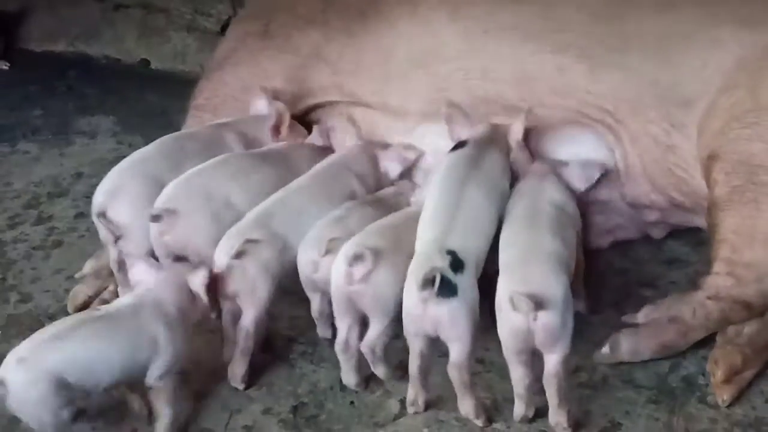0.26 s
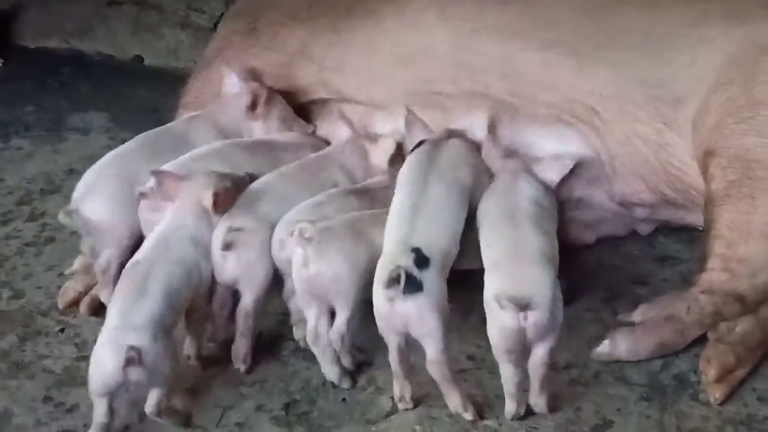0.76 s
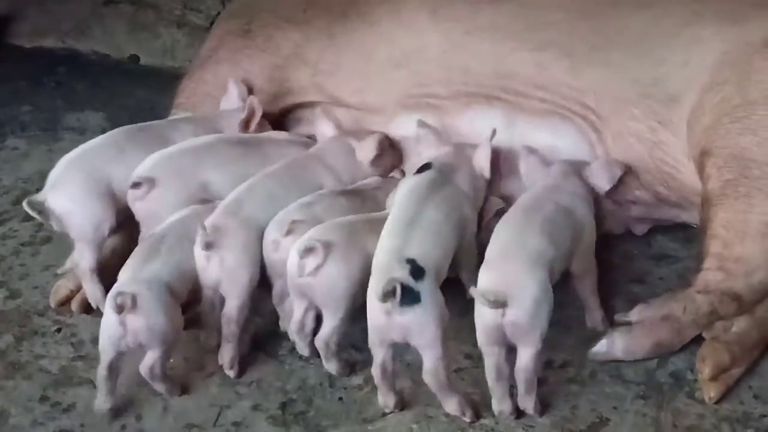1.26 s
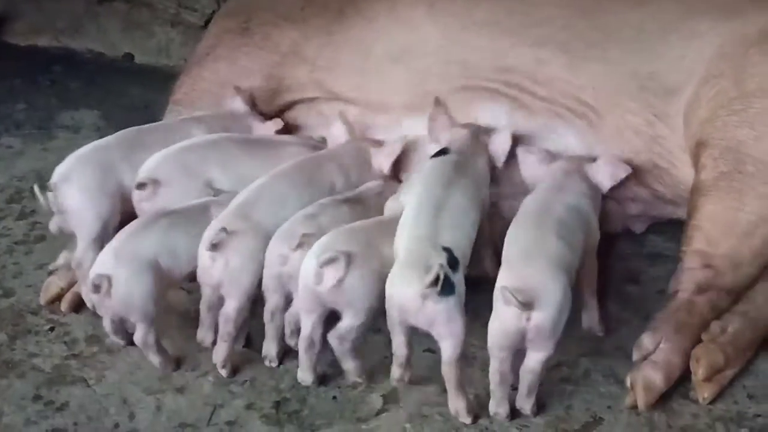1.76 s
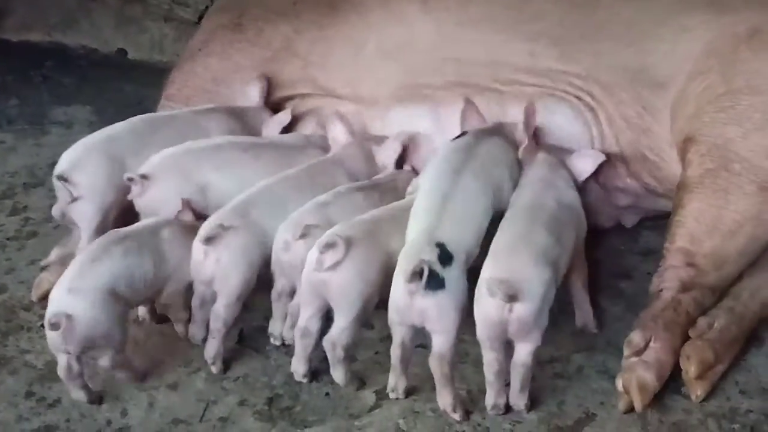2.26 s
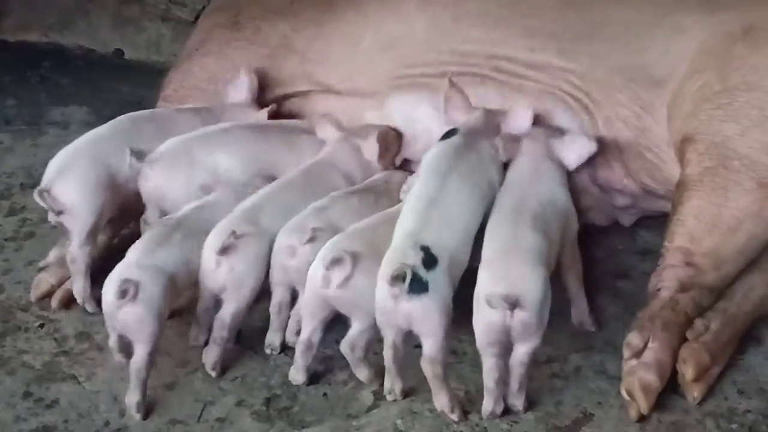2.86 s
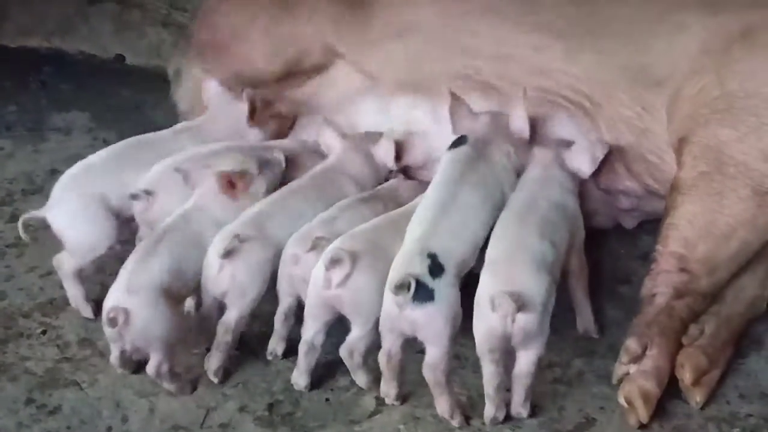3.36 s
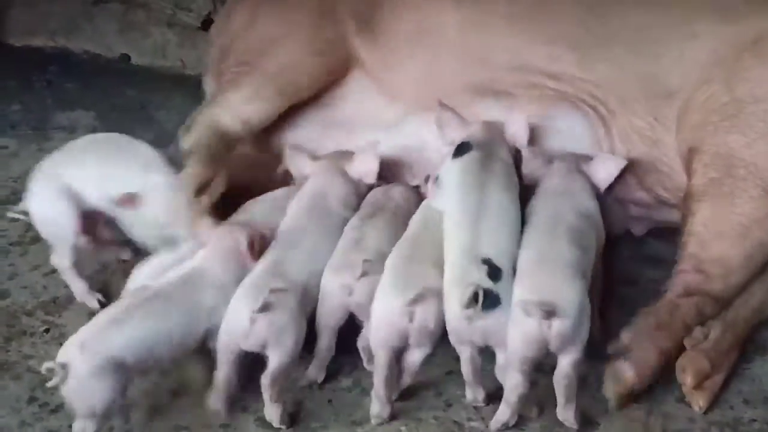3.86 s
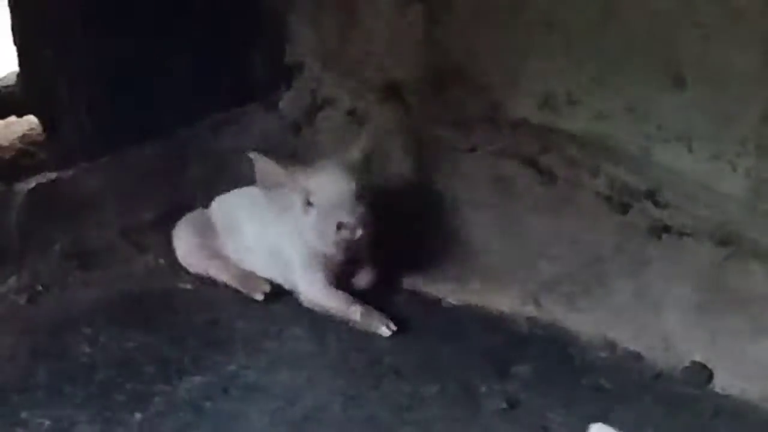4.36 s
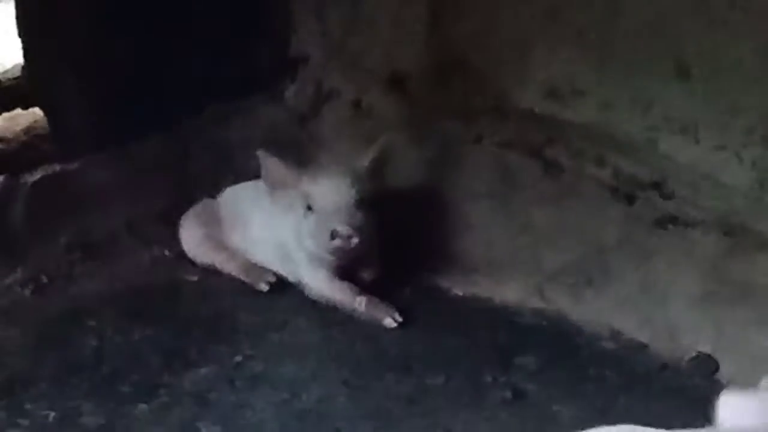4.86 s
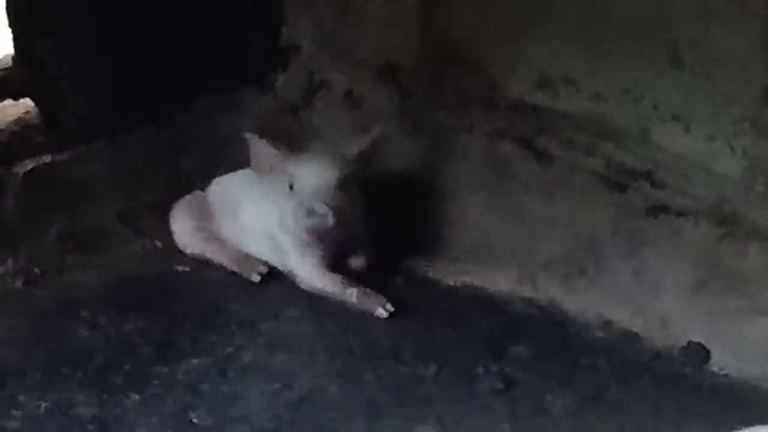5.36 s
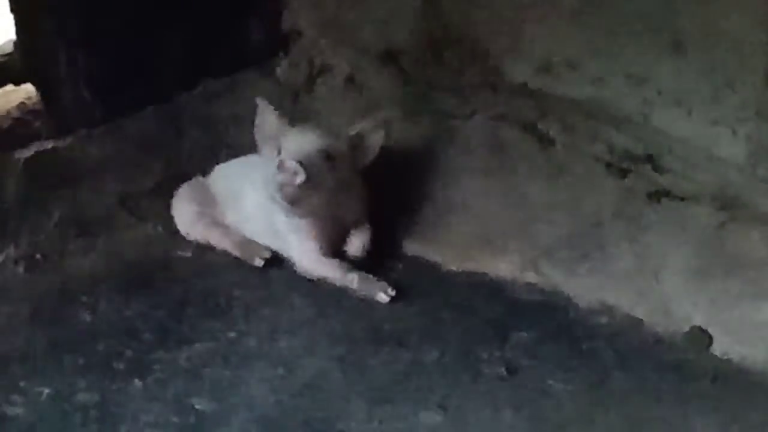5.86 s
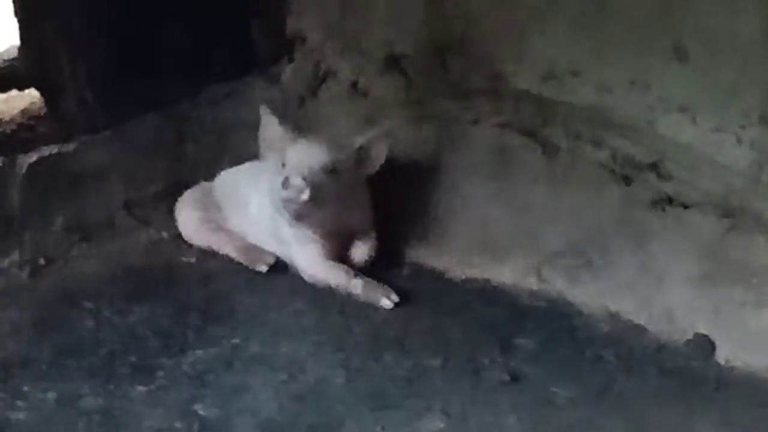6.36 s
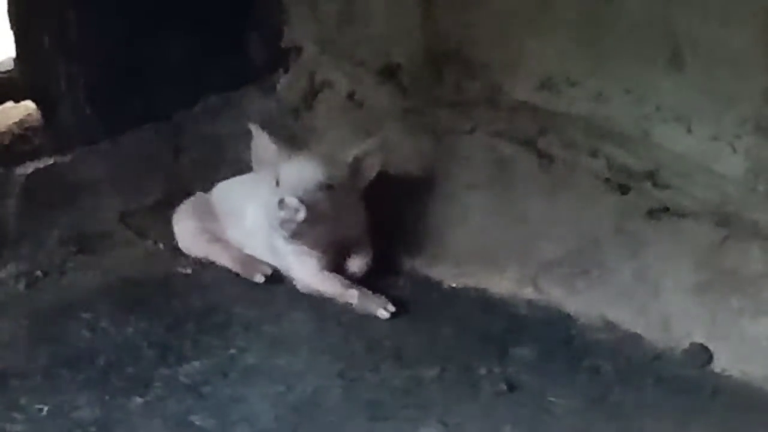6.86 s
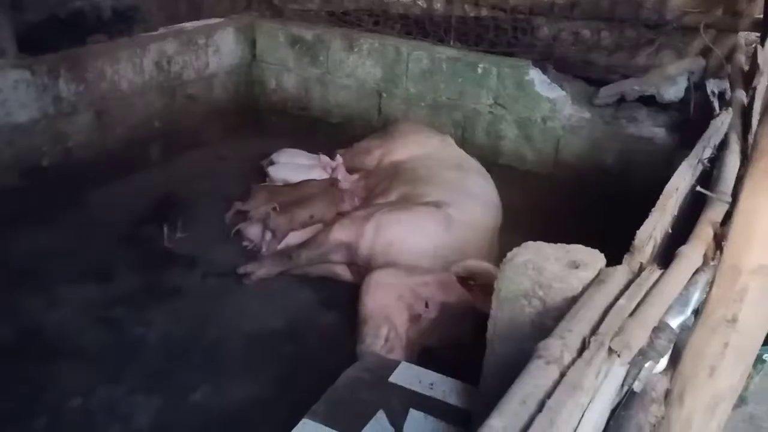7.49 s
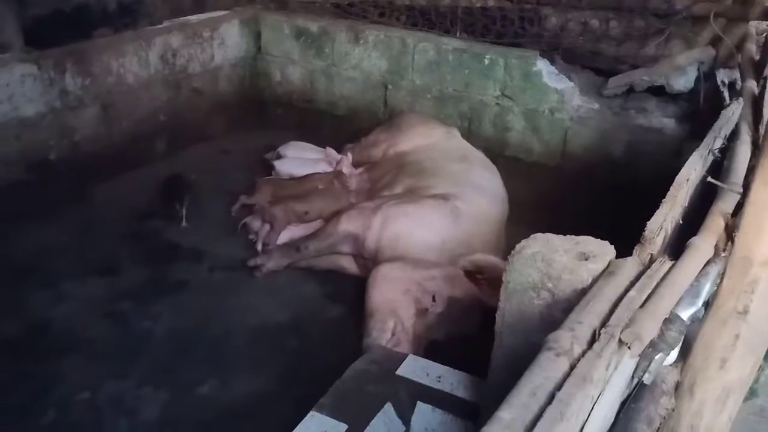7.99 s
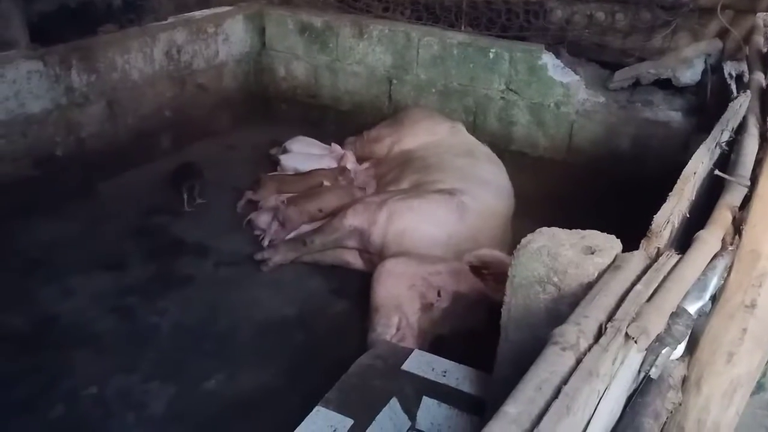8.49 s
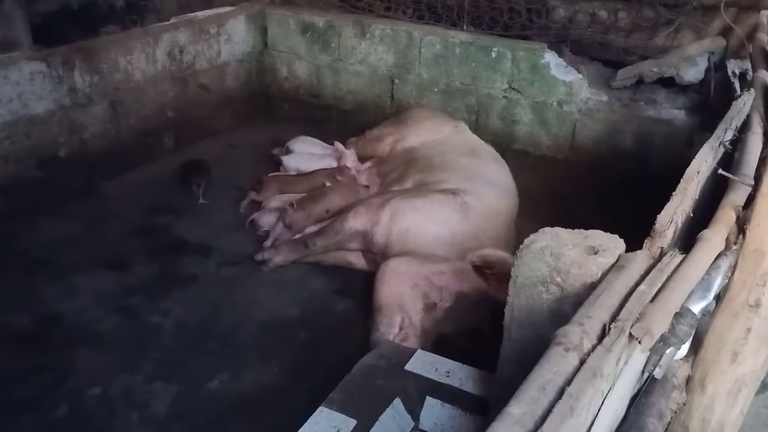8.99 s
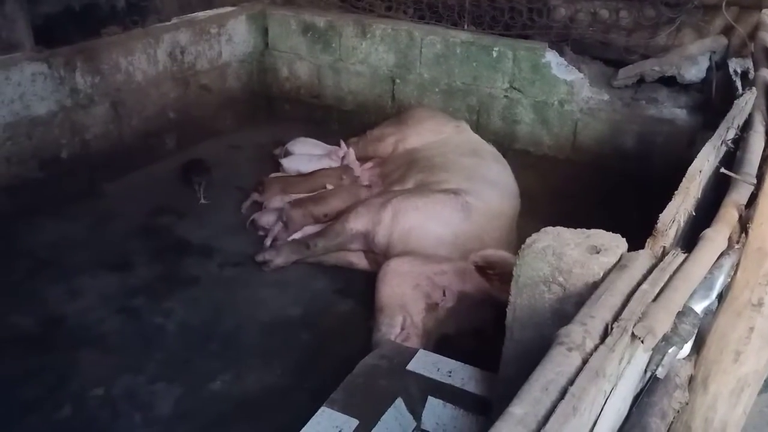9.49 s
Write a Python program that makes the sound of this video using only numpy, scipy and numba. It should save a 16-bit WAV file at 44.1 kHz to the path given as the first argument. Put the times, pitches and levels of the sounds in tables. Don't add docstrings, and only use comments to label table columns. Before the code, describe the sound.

In a hard-walled pen, piglets mutter hoarsely, squeal raggedly and breathe wetly at the teats while their mother gives brief, rattling grunts at regular intervals. Two sudden changes of place make the litter quieter and farther away. Short closed-mouth piglet hums, falling chick whistles and a few hoof or lip ticks stand out over soft hiss, heard by a small stereo microphone with little deep bass.

```python
import sys
import numpy as np
from scipy import signal
from scipy.fft import rfft, irfft
from scipy.io import wavfile
from scipy.ndimage import uniform_filter1d
from numba import njit

SR = 44100
rng = np.random.default_rng(int(sys.argv[2]) if len(sys.argv) > 2 else 0)


def boost_factor(decibels):
    exponent = np.asarray(decibels, float) / 20
    return 10 ** exponent


def persist_wave(psi):
    counts = np.round(np.clip(psi, -1, 1) * 32767).astype(np.int16)
    wavfile.write(sys.argv[1], SR, np.atleast_2d(counts).T)


N = 429093

# from t/s, left over right/dB, left lag/samples, echo level/dB
PLACES = [
    (0, 2.5, -1.5, 2),
    (3.979, 1, 8.5, -2),
    (7.35, -1.5, -14.5, 1.5),
]


def rms_one(x):
    return x / np.sqrt(np.mean(x ** 2) + 1e-20)


def drift(rate):
    knots = rng.standard_normal(N // 40)
    return np.interp(np.arange(N) * rate / SR, np.arange(len(knots)), knots) * 1.2


def swells(peak_s, peak_db, rise_s, fall_s, bend):
    def level_at(since, db, rise, fall):
        return db - 20 * np.where(since < 0, -since / rise, since / fall) ** bend

    rows = np.broadcast_arrays(peak_s, peak_db, rise_s, fall_s)
    t = np.arange(N) / SR
    coarse_db = level_at(t[::32, None] - peak_s, *rows[1:])
    lead = np.argmax(coarse_db, axis=1).repeat(32)[:N]
    since = t - peak_s[lead]
    return lead, since, level_at(since, *[r[lead] for r in rows[1:]])


@njit
def glide(x, hz, width, sr):
    y, r = np.zeros(len(x)), np.exp(-np.pi * width / sr)
    for i in range(2, len(x)):
        push = (1 - r * r) / 2 * (x[i] - x[i - 2])
        y[i] = push + 2 * r * np.cos(2 * np.pi * hz[i] / sr) * y[i - 1] - r * r * y[i - 2]
    return y


def steep_glide(x, hz, width_hz, second_width_hz):
    return glide(glide(x, hz, width_hz, SR), hz, second_width_hz, SR)


def tract(x, modes, patchy_db=0):
    out = 0
    for k, (hz, width, db) in enumerate(modes):
        ringing = steep_glide(x, np.full(N, 1. * hz), 1. * width, 2. * width)
        out = out + (-1) ** k * boost_factor(db + patchy_db * drift(7.7)) * ringing
    return rms_one(out)


def folds(turns, noisy, size_db, puff_s):
    clicks = np.diff(np.floor(turns), prepend=0).clip(0, 1) * boost_factor(size_db)
    puffs = signal.lfilter([1], [1, -np.exp(-1 / (puff_s * SR))], clicks) * rng.standard_normal(N)
    return np.sqrt(1 - noisy) * rms_one(clicks) + np.sqrt(noisy) * rms_one(puffs)


def air():
    # f/Hz, density/dB per Hz
    spectrum = [(18, -56), (30, -2), (213, 8), (1100, -11), (3230, 5), (4660, -11), (7080, -6.5),
                (8280, -15), (11000, -24), (15500, -21)]
    corner_hz, density_db = np.transpose(spectrum)
    hz = np.maximum(np.fft.rfftfreq(N, 1 / SR), 10)
    tilt = boost_factor(np.interp(np.log(hz), np.log(corner_hz), density_db))
    mid, side = rfft(rng.standard_normal((2, N))) * tilt
    side = side * hz / np.hypot(hz, 700)
    hiss = rms_one(irfft(np.array([mid + side, mid - side]), N))
    return boost_factor(-54 + 1.2 * drift(6)) * hiss


def chicks(start, slide_s, plunge_s, first_hz, knee_hz, last_hz, peak_db, soft_db, end_db):
    half = (slide_s + plunge_s) / 2
    lead, since, gate_db = swells(start + half, 0, half + .006, half + .006, bend=16)
    age = since + half[lead]
    slid = np.clip(age / slide_s[lead], 0, 1)
    plunged = np.clip((age - slide_s[lead]) / plunge_s[lead], 0, 1)
    pitch_hz = first_hz[lead] + (knee_hz - first_hz)[lead] * slid ** 2.2
    pitch_hz = pitch_hz + (last_hz - knee_hz)[lead] * plunged ** 1.1
    grown = np.clip(age / (slide_s + .4 * plunge_s)[lead], 0, 1) ** 5
    level_db = gate_db + peak_db[lead] - np.maximum(peak_db - soft_db, 0)[lead] * (1 - grown)
    level_db = level_db + end_db[lead] * plunged ** 1.8
    tremble = 1 + (.009 + .02 * plunged) * drift(150)
    phase = 2 * np.pi * np.cumsum(uniform_filter1d(pitch_hz, size=400) * tremble) / SR
    whistle = np.sin(phase) + (0.03 + 0.09 * plunged) * np.sin(2 * phase)
    return boost_factor(level_db + 3.5 * drift(60) + 1.8 * drift(250)) * whistle


def birds():
    # start t/s, slide/s, plunge/s, first f/Hz, peak level/dB
    peeps = [
        (.045, .058, .03, 4200, -31),
        (3.66, .18, .03, 4000, -31),
        (4.075, .203, .03, 4080, -31),
        (4.965, .175, .022, 4050, -35),
        (6.27, .15, .075, 4250, -29),
        (7.71, .195, .075, 4300, -22),
        (9.2, .092, .052, 4000, -27),
    ]
    # soft start level/dB, knee f/Hz, last f/Hz, change over the plunge/dB
    peep_shape = [(-50, 3850, 3300, -3), (-34, 3550, 2400, -12), (-39, 3420, 2350, -6),
                  (-39, 3560, 2300, 0), (-42, 3620, 2500, -14), (-43, 3600, 2150, -3),
                  (-36, 3700, 2300, -1.5)]
    # start t/s, length/s, first f/Hz, last f/Hz, peak level/dB
    chirps = [(.79, .125, 4150, 3850, -48), (.93, .065, 3700, 3250, -33), (2.24, .12, 4100, 3032, -51),
              (5.21, .09, 3850, 2970, -40), (5.31, .11, 3600, 3150, -40), (5.53, .07, 4400, 2600, -41),
              (5.79, .04, 4030, 2976, -44), (6.66, .05, 4310, 3285, -50), (8.27, .15, 3295, 2500, -46),
              (9.1, .08, 4490, 2670, -38.5), (9.665, .09, 4400, 3850, -55)]
    start, slide_s, plunge_s, first_hz, db = np.transpose(peeps)
    soft_db, knee_hz, last_hz, end_db = np.transpose(peep_shape)
    full = chicks(start, slide_s, plunge_s, first_hz, knee_hz, last_hz, db, soft_db, end_db)
    start, length, first_hz, last_hz, db = np.transpose(chirps)
    knee_hz = first_hz + (last_hz - first_hz) / 4
    soft_db, end_db = -46, -9.0 + 0 * db
    return full + chicks(start, length / 4, 3 * length / 4, first_hz, knee_hz, last_hz, db, soft_db, end_db)


def ticks():
    # t/s, peak level/dB
    taps = [
        (5.609, -28),
        (6.501, -27),
        (6.57, -42),
        (7.8513, -17),
        (8.778, -20),
        (9.592, -18),
        (8.028, -24),
    ]
    clicks = np.zeros(N)
    clicks[[round(s * SR) for s, db in taps]] = boost_factor(np.array(taps)[:, 1] - 4.5)
    burst = signal.lfilter([1], [1, -np.exp(-1 / (0.0013 * SR))], clicks) * rng.standard_normal(N)
    return signal.sosfilt(signal.butter(4, [1500, 7500], "band", fs=SR, output="sos"), burst)


def snuffle():
    # peak t/s, level/dB, time to gain 20 dB/s, time to lose it/s
    puffs = [(.05, -50, .45, .6), (.43, -34, .3, .09), (.62, -46, .1, .45), (1.19, -36, .6, .14),
             (1.49, -44, .28, .28), (1.98, -43.5, .43, .45), (2.65, -32.5, .35, .13),
             (2.9, -38.5, .13, .09), (3.17, -32, .07, .16), (3.36, -27, .1, .115), (3.6, -41, .05, .21),
             (3.96, -31, .12, .045), (4.09, -47, .14, .2), (4.31, -39, .07, .27), (4.77, -42, .065, .1),
             (5.2, -47, .7, .2), (5.31, -43, .18, .16), (5.5, -49, .1, .9), (6.1, -53, .9, .9),
             (6.45, -52, .35, .8), (6.8, -38.5, .07, .15), (6.99, -37, .045, .14), (7.7, -57, .9, .45),
             (7.86, -38, .03, .36), (8.78, -31, .027, .2), (9.13, -28.5, .25, .105), (9.32, -46, .075, .11),
             (9.595, -45, .005, .15)]
    # f/Hz, width/Hz, level/dB
    nostril = [(4200, 1400, 12), (5920, 720, 17.5), (6660, 600, 20), (7730, 1300, -2.5)]
    # f/Hz, width/Hz, level/dB
    sibilance = [(10540, 1700, 4.5), (13700, 1800, 1)]
    distance_db = [
        -10.5,
        -14.5,
        -18.5,
    ]
    # t/s, sibilance level/dB, time to gain 20 dB/s, time to lose it/s
    close_snout = [(1.9, 2.5, .4, .9)]
    level_db = swells(*np.transpose(puffs), bend=1.1)[2]
    place = np.searchsorted([p[0] for p in PLACES[1:]], np.arange(N) / SR)
    turned_db = swells(*np.transpose(close_snout), bend=1.1)[2]
    near_db = np.maximum(np.array(distance_db)[place], turned_db)
    nose, teeth = rng.standard_normal((2, N))
    both = tract(nose, nostril, patchy_db=4.0) + boost_factor(near_db) * tract(teeth, sibilance, patchy_db=3.5)
    return boost_factor(level_db - 3.0 + 3.1 * drift(70) + 2.5 * drift(300)) * both


def mutter():
    # peak t/s, throat level/dB, time to lose 20 dB/s, chest over throat/dB
    mutters = [(.04, -43, .1, -1), (.3, -50, .9, 5), (.43, -46, .25, -3), (.83, -40, .55, -10),
               (1.208, -38, .13, -5), (1.37, -44, .3, -1.5), (1.758, -41.5, .14, -8.5),
               (2.13, -38.5, .15, -5), (2.47, -51, .45, -1.5), (2.856, -43, .23, -16),
               (3.122, -37, .18, -13), (3.53, -41, .53, -3.5), (4.09, -39, .1, -8), (4.3, -41, .4, -8),
               (4.41, -40, .16, -8), (4.94, -41.5, .4, -6), (5.15, -46, .2, -4), (5.334, -40, .075, -3),
               (5.475, -40, .1, -4), (5.53, -38, .06, -1.5), (5.692, -42, .57, -3.5), (6.96, -59, .3, -3),
               (7.12, -57, .05, -12), (7.64, -45, .09, -2.5), (7.864, -44, .4, -6), (8.02, -50, .35, -12),
               (8.15, -47, .07, -17), (8.55, -63, .6, -1.5), (9.0, -54, .3, 1.5), (9.18, -54, .05, -4.5),
               (9.73, -57, .1, -6.5)]
    peak_s, peak_db, fall_s, chest_db = np.transpose(mutters)
    lead, since, level_db = swells(peak_s, peak_db, .06, fall_s, bend=1.15)
    turns = np.cumsum(150 * boost_factor(2.0 * drift(25))) / SR
    source = folds(turns, 0.8, 2.63 * drift(90), puff_s=0.015)
    throat_hz, chest_hz = 720 * boost_factor(0.27 * drift(4)), 335 * boost_factor(1.5 * drift(7.4))
    throat = rms_one(steep_glide(source, throat_hz, 430.0, 330.0))
    chest = rms_one(steep_glide(source, chest_hz, 230.0, 280.0))
    chest_gain = boost_factor(uniform_filter1d(chest_db[lead], size=1500))
    return boost_factor(level_db + 0.5) * (throat - chest_gain * chest)


def rasp(rows, width_hz, wide_share):
    peak_s, peak_db, rise_s, fall_s, hz = np.transpose(rows)
    lead, since, level_db = swells(peak_s, peak_db, rise_s, fall_s, bend=1.1)
    mouth_hz = uniform_filter1d(hz[lead], size=1800) * boost_factor(.5 * drift(40))
    breathy = wide_share * np.clip(.18 - 0.017 * (level_db + 30.5), .05, .6)
    turns = np.cumsum(260 * boost_factor(2.5 * drift(30))) / SR
    source = folds(turns, 0.86, 3.9 * drift(120), puff_s=0.0078)
    narrow = rms_one(steep_glide(source, mouth_hz, width_hz, 2.6 * width_hz))
    wide = tract(source, [(1450, 600, -4), (2300, 1370, -6), (3000, 900, 1.5)], patchy_db=3.5)
    return boost_factor(level_db + 3.0) * (np.sqrt(1 - breathy) * narrow + np.sqrt(breathy) * wide)


def rasps():
    # peak t/s, level/dB, time to gain 20 dB/s,
    # time to lose it/s, mouth f/Hz
    first_calls = [(.14, -48, .04, .35, 2250), (.33, -44, .05, .2, 2800), (.44, -40, .1, .13, 2150),
                   (.81, -38.5, .05, .45, 2280), (1.156, -45.5, .4, .3, 2170), (1.46, -37, .07, .14, 3050),
                   (1.96, -32, .08, .14, 3350), (2.12, -42, .1, .3, 2450), (2.5, -50, .15, .2, 1600),
                   (2.63, -26, .015, .11, 2650), (2.9, -23.5, .06, .07, 2300), (3.15, -29, .04, .12, 2500),
                   (3.2, -34, .08, .1, 2800), (3.26, -35.5, .1, .1, 2750), (3.34, -28, .06, .14, 2850),
                   (3.42, -35, .1, .12, 3100), (3.7, -46, .3, .3, 1950), (3.85, -42, .3, .15, 2100),
                   (3.93, -40, .1, .1, 3000), (3.965, -33, .05, .03, 2500),
                   (4.025, -40, .008, .015, 2300), (4.062, -27, .025, .05, 2250), (4.3, -35, .02, .13, 2620),
           (4.47, -48.5, .3, .04, 2300), (4.756, -34, .03, .17, 1900), (5.17, -45, .15, .12, 2400),
           (5.33, -47, .15, .15, 1500), (5.53, -46.5, .2, .02, 2300), (5.926, -50, .025, .4, 2000),
           (6.36, -44.5, .02, .2, 1620), (6.45, -40, .3, .03, 1900), (6.568, -32.5, .015, .04, 1690),
           (6.68, -42.5, .015, .03, 1690), (7.008, -28, .06, .09, 1750), (7.3, -53, .25, .05, 2064),
           (7.7, -50, .3, .025, 2500), (7.9, -45, .16, .1, 2660), (8.02, -45.5, .05, .22, 2660),
           (9.048, -50, .2, .15, 2680), (9.36, -38, .04, .1, 2400), (9.73, -51, .05, .05, 2100)]
    second = [(.36, -43, .05, .15, 2450), (1.38, -43, .1, .1, 1600), (1.49, -39, .03, .09, 2300),
              (1.67, -45, .02, .05, 1250), (1.925, -33, .02, .1, 1900), (2.66, -36, .03, .06, 1500),
              (3.2, -36, .09, .1, 1450), (3.31, -33, .03, .05, 3950), (3.41, -30, .07, .09, 1850),
              (3.72, -46, .04, .05, 1280), (3.9, -43, .05, .06, 1400), (3.96, -35, .04, .02, 1550),
              (4.052, -28.5, .012, .06, 1650), (5.51, -44, .015, .05, 3300), (7.0, -36, .05, .06, 2700),
              (9.34, -42, .04, .06, 2200)]
    first_piglet = rasp(first_calls, width_hz=260.0, wide_share=.9)
    return first_piglet + rasp(second, width_hz=200.0, wide_share=.3)


def squeals():
    # start t/s, length/s, first mouth f/Hz, last mouth f/Hz, level/dB
    slides = [(.295, .06, 3300, 2400, -43), (.33, .1, 2950, 2850, -43), (.32, .05, 2150, 1750, -44),
              (.395, .075, 1950, 1900, -40), (.41, .04, 1420, 1400, -44), (.115, .03, 2650, 2350, -45),
              (.56, .07, 1350, 2200, -44), (1.34, .12, 1500, 3150, -41), (1.695, .1, 1700, 3050, -46),
              (1.72, .2, 1200, 1750, -45), (1.785, .19, 3000, 3450, -39), (2.275, .06, 1600, 1560, -46),
              (2.31, .08, 1180, 1260, -40), (2.38, .06, 1300, 1900, -42), (2.44, .17, 3150, 3300, -42),
              (2.5, .06, 1980, 1980, -48), (2.615, .06, 3050, 3100, -31), (2.83, .09, 1800, 2300, -33),
              (3.1, .08, 1800, 3050, -31), (3.17, .08, 3150, 3100, -32), (3.935, .045, 1650, 2150, -36),
              (5.14, .05, 2750, 2200, -43)]
    edge_s, width_hz, top_db = .02, 170, -14
    out = np.zeros(N)
    turns = np.cumsum(330 * boost_factor(1.5 * drift(30))) / SR
    source = folds(turns, 0.7, 3.5 * drift(120), puff_s=0.004)
    tremble = boost_factor(.25 * drift(50))
    for start, length, first_hz, last_hz, db in slides:
        t = np.arange(round((length + edge_s) * SR)) / SR
        begin = round(start * SR)
        span = slice(begin, begin + len(t))
        hz = (first_hz + (last_hz - first_hz) * np.clip(t / length, 0, 1)) * tremble[span]
        low, high = (rms_one(steep_glide(source[span], k * hz, k * width_hz, 2.2 * k * width_hz))
                     for k in (1., 2.15))
        gate = np.clip(np.minimum(t, t[-1] - t) / edge_s, 0, 1) ** 2
        out[span] += boost_factor(db) * gate * (low + boost_factor(top_db) * high)
    return out


def hum(rows, rise_share, climb_per_s, sag_per_s, second, third, boost_db):
    peak_s, peak_db, length, hz = np.transpose(rows)
    fall_share = 1 - rise_share
    lead, since, level_db = swells(peak_s, peak_db, rise_share * length, fall_share * length, bend=4)
    slope = np.where(since < 0, climb_per_s, -sag_per_s) * since
    droop = .14 * np.clip(since / length[lead] / fall_share, 0, 2) ** 3
    pitch_hz = hz[lead] * np.clip(1 + slope - droop, .5, 1.5)
    phase = 2 * np.pi * np.cumsum(pitch_hz * (1 + 0.017 * drift(60))) / SR
    wave = np.sin(phase) + second * np.sin(2 * phase)
    wave = wave + third * boost_factor(5.0 * drift(70)) * np.sin(3 * phase + 1.2 * drift(60))
    return boost_factor(level_db + boost_db + 1.8 * drift(60)) * wave


def hums():
    # peak t/s, level/dB, length/s, pitch f/Hz
    closed = [(.05, -56, .09, 180), (1.17, -53, .05, 295), (1.215, -43, .1, 250), (1.4, -58, .08, 190),
              (1.63, -62, .1, 315), (2.65, -59, .12, 350), (2.98, -62, .07, 220), (3.2, -55, .14, 340),
              (3.628, -37.5, .1, 254), (3.95, -53, .06, 285), (4.08, -53, .08, 186),
              (4.348, -33, .205, 250), (5.155, -57, .06, 175), (5.298, -38, .14, 256),
              (5.497, -52, .07, 195), (5.73, -35, .195, 250), (6.25, -62, .06, 180), (6.615, -59, .04, 210),
              (7.315, -57, .04, 200), (7.875, -48, .09, 255), (8.0, -56, .11, 235), (8.36, -63, .05, 195),
              (8.7, -57, .03, 200)]
    # peak t/s, level/dB, length/s, pitch f/Hz
    moan = [
        (.165, -48, .03, 920),
        (.4, -40, .16, 430),
        (.52, -37, .16, 515),
    ]
    return (hum(closed, rise_share=.35, climb_per_s=.05, sag_per_s=.35, second=0.07, third=0.2, boost_db=10.0)
            + hum(moan, rise_share=.65, climb_per_s=.3, sag_per_s=.4, second=0.7, third=0.08, boost_db=-1.5))


def sow():
    # peak t/s, chest level/dB, mouth over chest/dB, belly over chest/dB
    grunts = [
        (.71, -25, 7.5, -2.5),
        (2.035, -26.5, 5.5, -1.5),
        (3.428, -21, -10, -4),
        (4.815, -24, -13, -10),
        (6.79, -19.5, -6, -8),
        (7.488, -25, -4.5, -12),
        (8.87, -22.5, -4.5, -13),
    ]
    # first beat t/s, flutter f/Hz, flutter depth/dB, mouth f/Hz, snout over chest/dB
    flutters = [(.6335, 32.6, 24, 1040, -3), (1.9525, 32.3, 24, 1080, .5), (3.325, 31.5, 9, 1080, -9),
                (4.714, 30.5, 14, 1050, -13), (6.667, 33.3, 12, 1000, -7), (7.362, 32.0, 18, 990, -8),
                (8.716, 32.5, 14, 990, -11)]
    # time to gain 20 dB/s, time to lose it/s, lower snout f/Hz, upper snout f/Hz
    grunt_shape = [(.125, .11, 2280, 2900), (.14, .075, 1870, 2800), (.125, .12, 1850, 2750),
                   (.125, .12, 1900, 2700), (.125, .12, 2000, 2700), (.14, .11, 2000, 2620),
                   (.14, .11, 2000, 2550)]
    # f/Hz, width/Hz, level/dB
    chest_modes = [(210.3, 69, 7.5), (385, 140, -1), (590, 220, -1.5), (800, 150, -8)]
    # f/Hz, width/Hz, level/dB
    belly_modes = [(45, 25, -22), (66, 22, -8), (100, 24, -6.5)]
    # f/Hz, width/Hz, level/dB
    snout_modes = [(1600, 450, -2), (2300, 500, -4), (3200, 300, -4), (4200, 350, -13)]
    peak_s, peak_db, mouth_db, belly_db = np.transpose(grunts)
    rise_s, fall_s, low_hz, high_hz = np.transpose(grunt_shape)
    lead, since, chest_db = swells(peak_s, peak_db, rise_s, fall_s, bend=1.3)
    below_peak_db = chest_db - peak_db[lead]
    mouth_db = mouth_db[lead] + .3 * below_peak_db
    belly_db = belly_db[lead] + .5 * below_peak_db
    start, flutter, depth_db, mouth_hz, snout_db = np.array(flutters)[lead].T
    noisy = 5 / depth_db
    t = np.arange(N) / SR
    turns = 3 * (t - start) * flutter + .3 * noisy * drift(60) + 99
    size_db = depth_db * (1 - turns % 3) / 3 + 4.5 * noisy * drift(100)
    size_db = size_db + 9 * np.minimum(turns - 98.5, 0)
    source = folds(turns, np.clip(noisy, 0, .99), size_db, puff_s=0.0062)

    first = glide(glide(source, mouth_hz, 350., SR), mouth_hz * boost_factor(.3 * drift(20)), 130., SR)
    second = glide(glide(source, 1.47 * mouth_hz, 78.0, SR), 1.4 * mouth_hz, 270.0, SR)
    nasal = []
    for hz in (low_hz, high_hz):
        wavering = glide(source, hz[lead] * boost_factor(.3 * drift(15)), 190.0, SR)
        nasal.append(rms_one(glide(wavering, hz[lead], 500.0, SR)))
    snout = .65 * nasal[0] - .75 * nasal[1] + .65 * tract(source, snout_modes, patchy_db=3.0)
    snout = np.roll(snout, round(.005 * SR))
    upper = boost_factor(mouth_db) * rms_one(first - .55 * second) + boost_factor(snout_db) * snout
    lower = tract(source, chest_modes, patchy_db=1.5) - boost_factor(belly_db) * tract(source, belly_modes)
    return boost_factor(chest_db - 4.5) * (lower + upper)


def pen(x):
    out, t = np.zeros((2, N)), np.arange(SR // 3) / SR
    t60_s, early = .15, 24
    ends = [p[0] for p in PLACES[1:]] + [N / SR]
    for (start, pan_db, lag, echo_db), end in zip(PLACES, ends):
        mid, side = rng.standard_normal((2, len(t))) * boost_factor(-60 * t / t60_s) * (t > .003)
        mid = signal.sosfilt(signal.butter(2, 330, "high", fs=SR, output="sos"), mid)
        side = signal.sosfilt(signal.butter(2, 500, "high", fs=SR, output="sos"), side)
        echo = rms_one(np.array([mid + side, mid - side])) * boost_factor(echo_db) / np.sqrt(len(t))
        begin, stop = round(start * SR), round(end * SR)
        for c, sign in enumerate((1, -1)):
            echo[c] += np.sinc(np.arange(len(t)) - early - sign * lag / 2)
            heard = signal.fftconvolve(x[begin:], echo[c])[early:early + stop - begin]
            out[c, begin:stop] = boost_factor(sign * pan_db / 2) * heard
    return out


def scene():
    litter = hums() + mutter() + rasps() + squeals() + snuffle()
    return pen(sow() + litter + birds() + ticks()) + air()


def band_limit(x):
    return signal.sosfilt(signal.butter(12, 15510, fs=SR, output="sos"), x)


def record(dry):
    dry = signal.sosfilt(signal.butter(2, 48, "high", fs=SR, output="sos"), dry)
    warm = signal.sosfilt(signal.butter(1, 2000, fs=SR, output="sos"), dry)
    dry = boost_factor([[-1.2], [1.2]]) * dry + np.array([[.27], [-.2]]) * warm
    body_top_hz = 7680
    body = signal.sosfilt(signal.ellip(8, .5, 60, body_top_hz, fs=SR, output="sos"), dry)
    treble = signal.sosfilt(signal.ellip(8, .5, 60, 1.03 * body_top_hz, "high", fs=SR, output="sos"), dry)
    return band_limit(body + boost_factor(-9.5) * treble)


dry = scene()
out = record(dry)
persist_wave(out)
```